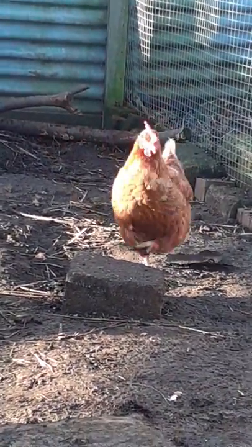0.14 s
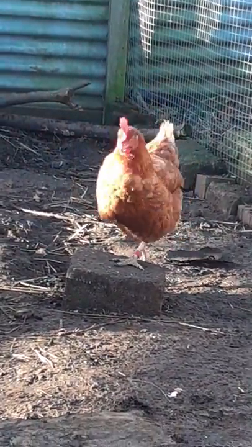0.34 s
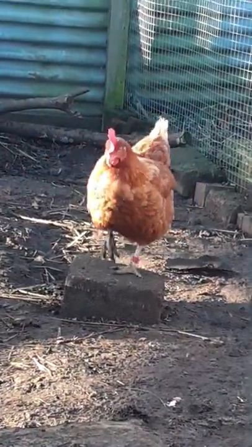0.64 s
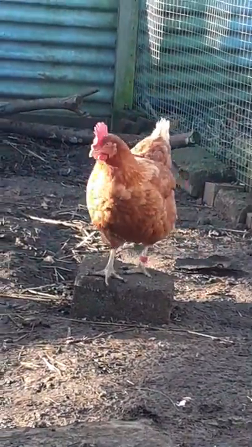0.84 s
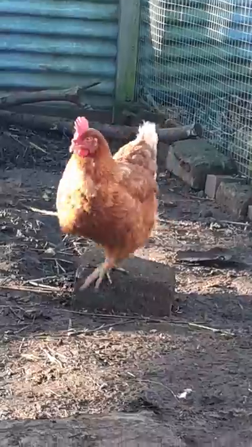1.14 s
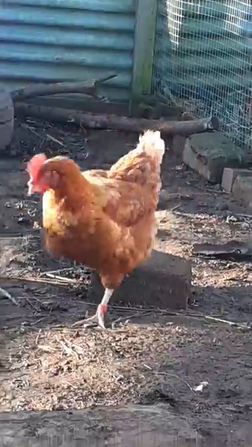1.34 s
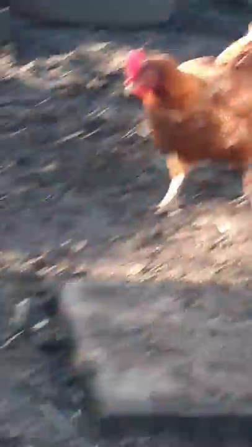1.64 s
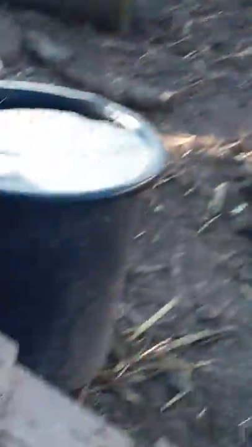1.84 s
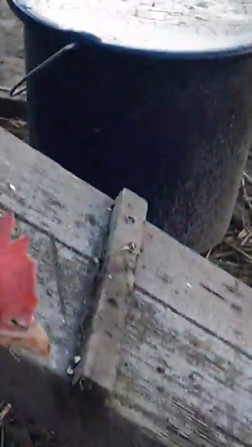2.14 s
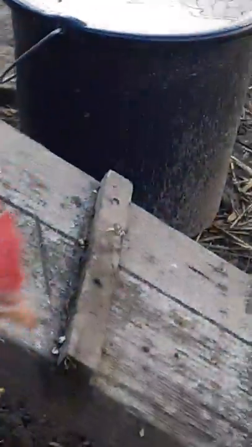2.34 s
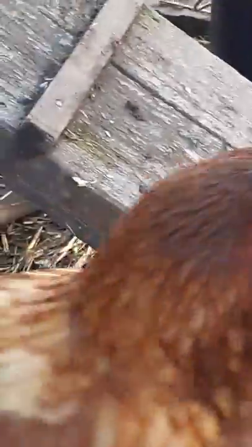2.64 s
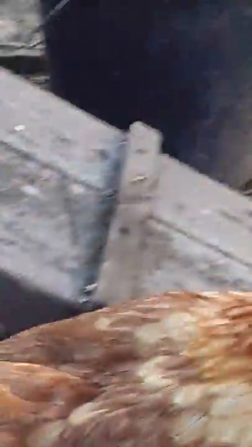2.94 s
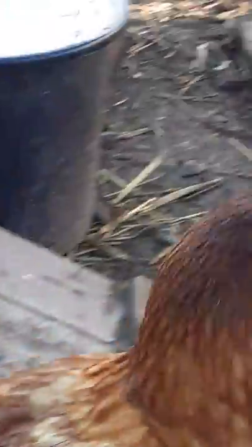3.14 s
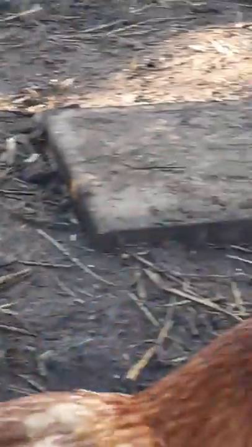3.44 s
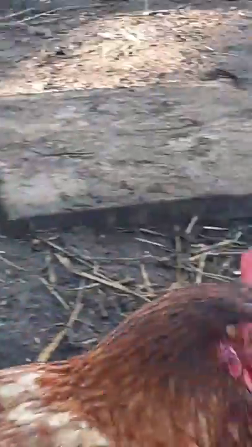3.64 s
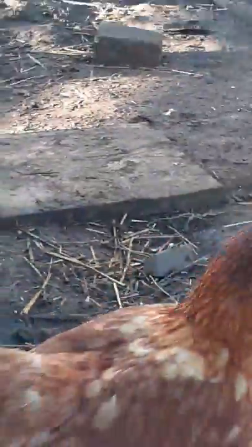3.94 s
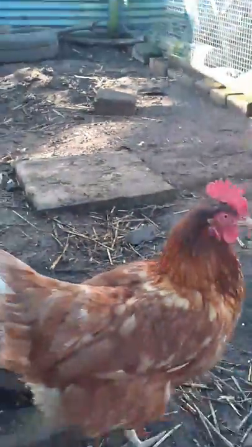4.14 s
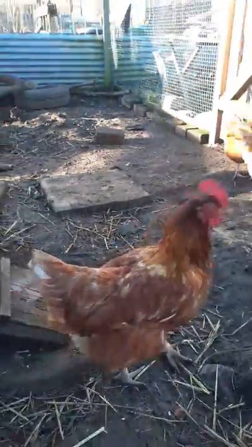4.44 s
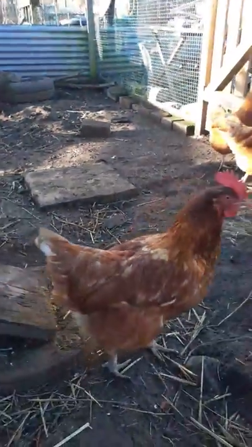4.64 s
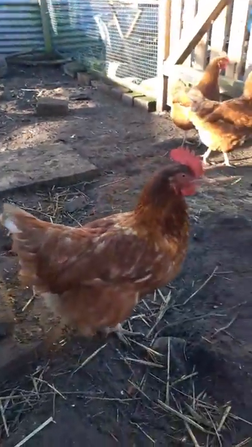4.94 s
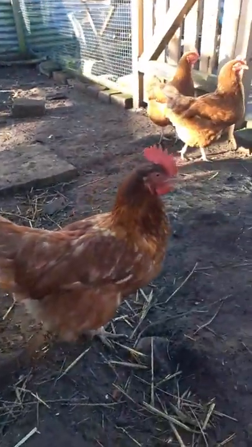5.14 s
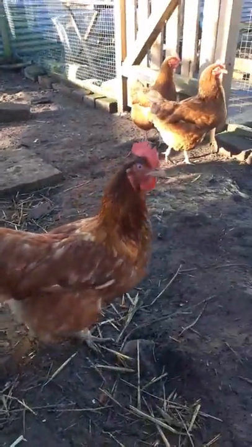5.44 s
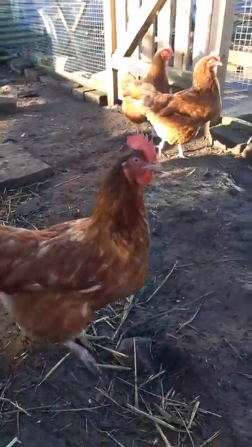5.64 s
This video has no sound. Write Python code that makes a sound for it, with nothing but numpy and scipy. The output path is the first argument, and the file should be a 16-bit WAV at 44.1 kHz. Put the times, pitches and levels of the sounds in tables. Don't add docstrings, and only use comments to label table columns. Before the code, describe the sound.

Outdoors in a chicken run, a stereo handheld phone picks up a low wind thump and a soft falling cluck at 0.1 s. From about 0.2 to 1.45 s a nearby hen gives one long call: a gravelly rising onset, then a nasal, creaky climb to roughly twice its starting pitch, with sudden cracks to higher notes, growing louder, clearer and brighter near 1.25 s before breaking off. A brisk, rough rising cluck follows at 1.63 s. Straw rustles around 1.9 s, a tiny distant bird whistle falls at 2.4 s, and a sharp straw snap comes at 2.7 s. Four short, quieter clucks run from 3.0 to 3.3 s, leading into a second, softer and hoarser rising call until 4.35 s. A scratchy rising cluck lands at 4.44 s. Afterwards only soft wind, light straw rustle and steady distant traffic hum remain until about 5.8 s. Little echo.

```python
import sys
import numpy as np
from scipy import signal
from scipy.fft import rfft, irfft
from scipy.io import wavfile
from scipy.ndimage import uniform_filter1d

SR = 44100
rng = np.random.default_rng(int(sys.argv[2]) if len(sys.argv) > 2 else 0)


def file_out(sig):
    cols = np.atleast_2d(sig).T
    lim = np.clip(cols, -1, 1)
    pcm = np.round(lim * 32767).astype(np.int16)
    wavfile.write(sys.argv[1], SR, pcm)


def field_ratio(decibels):
    return 10 ** (np.asarray(decibels, dtype=float) / 20)


N = 254898

# t/s, pitch f/Hz, effort level/dB, press level/dB
FIRST_CALL = [
    [(.175, 233.4, -49, 8), (.23, 255.9, -47.5, 10.5), (.28, 310.3, -47.5, 7.5), (.344, 376, -39.5, -4.5),
     (.39, 368, -40.5, -1.5)],
    [(.385, 368.7, -39.5, -12), (.46, 368.4, -44.5, -10), (.6, 391.8, -38, -9), (.68, 431.5, -37.5, -8),
     (.79, 439, -38, 4), (.945, 432.7, -36.5, 3), (1.07, 485, -31.5, -4), (1.2, 481, -29.5, -6),
     (1.27, 502.8, -29, -7)],
    [(1.265, 565.4, -32, -1), (1.272, 508.2, -29.5, -13), (1.306, 514, -31.5, -10.5),
     (1.318, 522, -30, -12), (1.35, 514, -29, -10.5), (1.394, 525.7, -30.5, -2), (1.405, 511, -43, 18),
     (1.425, 521, -32, -0.5), (1.448, 529, -58, 11)],
]
# t/s, pitch f/Hz, effort level/dB, press level/dB
SECOND_CALL = [
    [(3.362, 258, -62, 5), (3.375, 274.3, -54, 1.5), (3.44, 331.8, -48.5, -1.5), (3.56, 357.2, -46, -1.5),
     (3.62, 363.3, -44, -8), (3.706, 362, -46, -14)],
    [(3.702, 369.5, -47.5, -2), (3.74, 377.7, -45.5, -8.5), (3.82, 382.8, -45.5, -5.5),
     (3.95, 396.6, -42.5, -9.5), (4.085, 416.5, -49.5, 3), (4.15, 435.5, -43, -3.5),
     (4.26, 459.8, -36.5, -1.5), (4.333, 473, -32.5, -0.5), (4.342, 469.4, -44.5, -4),
     (4.36, 479.6, -52, 11)],
]
# t/s, length/s, effort level/dB, first f/Hz, last f/Hz
CLUCKS = [
    (0.111, 0.055, -52.5, 346, 273),
    (1.627, 0.061, -43, 371.7, 483.3),
    (3.012, 0.04, -51, 296, 274),
    (3.121, 0.037, -47, 310, 340),
    (3.158, 0.018, -52, 323, 315),
    (3.235, 0.072, -50.5, 293.7, 262.4),
    (4.437, 0.11, -48, 384.5, 489.7),
]
# t/s, press level/dB
CLUCK_PRESS = [(.1, 5), (1.63, -6.5), (1.66, 2), (3.02, 1.5), (3.13, -4.5), (3.26, 0), (4.45, -11.5),
               (4.5, 10), (4.54, 2)]
# t/s, level/dB
CLUCK_LIFT = [(.1, 6), (1.63, 5), (3.01, 7.5), (3.13, 9), (3.24, 6), (4.44, 0)]
# t/s, roughness/0-1, period doubling/0-1
CALL_STATE = [(.2, .55, 0), (.25, .3, 0), (.375, .28, 0), (.39, .8, .4), (.48, .8, .5), (.56, .65, .3),
              (.75, .55, .2), (.8, .24, .6), (.9, .3, .6), (1.0, .26, .55), (1.1, .36, .3), (1.18, .28, .1),
              (1.2, .19, .1), (1.265, .2, .1), (1.28, .06, .06), (1.39, .04, .05), (1.42, .35, 0),
              (3.4, .55, 0), (3.45, .42, 0), (3.56, .45, 0), (3.63, .8, 0), (3.84, .7, .1), (3.88, .45, .1),
              (4.0, .33, .1), (4.05, .28, 1), (4.1, .33, 1), (4.125, .7, 1), (4.16, .36, 1),
              (4.24, .33, .7), (4.33, .3, .5)]
# t/s, roughness/0-1.3, period doubling/0-1
CLUCK_STATE = [(.1, .45, 0), (1.62, .85, .4), (1.65, .55, .3), (1.68, .8, .4), (3.0, .8, .2), (3.2, .75, 0),
               (3.25, .42, 0), (3.3, .42, 0), (4.44, 1.3, .7), (4.51, 1.2, .6), (4.535, .6, .2)]
# t/s, length/s, f/Hz,
# fundamental level/dB, second level/dB
BREAKS = [(0.661, 0.012, 532, -33.5, -47), (0.674, 0.014, 562, -35, -45), (0.69, 0.0042, 602, -39, -48),
          (0.693, 0.0047, 562, -30, -45), (0.733, 0.0087, 590, -34, -48), (0.752, 0.0088, 622, -39, -48),
          (0.759, 0.031, 684, -31.5, -54), (0.844, 0.022, 658.5, -31, -47.5),
          (0.892, 0.0081, 614, -32.5, -42), (0.911, 0.006, 592, -37, -41), (0.923, 0.004, 576, -33.5, -47),
          (0.968, 0.007, 586.4, -35, -47), (1.018, 0.053, 539, -31.5, -50),
          (1.118, 0.004975, 551, -30, -39), (1.129, 0.0046, 592, -32, -45), (1.142, 0.015, 547, -31, -48),
          (1.172, 0.0043, 548.7, -32, -46), (1.242, 0.0042, 560, -26, -35), (1.403, 0.0077, 597, -29, -41),
          (3.425, 0.0071, 326, -62, -48), (3.705, 0.036, 373, -44, -40.5), (3.766, 0.012, 376, -46, -41),
          (3.801, 0.019, 383, -44.5, -44), (3.835, 0.024, 333.3, -56, -41),
          (4.099, 0.0086, 405.5, -63, -41), (4.126, 0.018, 407.4, -42, -42)]
# f/Hz, level/dB
BREAK_THIRD = [(1100, -11), (1560, -31), (1630, -11.5), (1760, -23), (2050, -41)]
# f/Hz, level/dB
THROAT = [(480, -7.5), (600, -2), (760, 4.5), (850, -2), (960, -3), (1100, -1.5), (1300, -14.5),
          (1550, -12.5)]
# f/Hz, level/dB
BEAK = [(1650, 7), (2050, 0), (2600, 1), (3050, -6), (3400, 2), (3650, 3), (3900, -4), (4150, -2),
        (4650, -17), (5150, -3), (5700, -19), (6200, -7), (7000, -22), (8300, -14), (9500, -34),
        (12000, -22)]
# t/s, level/dB
GAPE = [(.2, -11.5), (.3, -6), (.385, -6), (.45, 3), (.9, -2.5), (1.05, -2.5), (1.19, 7), (1.26, 12.5),
        (1.285, 13), (1.32, 12), (1.36, 5.5), (1.385, 11.5), (1.4, -2), (1.43, -1), (1.63, 7), (1.65, 13.5),
        (1.68, 6), (3.0, 2), (3.3, 7.5), (3.4, 2.5), (3.56, 1), (3.68, 5.5), (3.8, -3), (4.0, 8.5),
        (4.2, 3), (4.31, -0.5), (4.335, -2), (4.345, -14), (4.44, -5), (4.51, 0)]
# f/Hz, share
DIMMED = [(1800, 0), (1880, .3), (1940, 1.2), (2150, .7), (2300, .35), (2800, .35), (3000, .8), (3300, .3),
          (4250, .35), (4450, 1)]
# f/Hz, width/Hz, level/dB
RASP = [(780, 380, 16.5), (1410, 116, 1.5)]
# t/s, level/dB, f/Hz
CROP = [(.3, -20, 500), (.45, 7, 465), (.65, -3.5, 515), (.85, -3, 570), (1.4, -3, 635), (1.6, -21, 650),
        (3.0, -33, 680), (3.8, -23, 690), (4.1, 9.5, 658), (4.22, -4, 694.7), (4.3, -16, 717),
        (4.5, -1.5, 643)]
# f/Hz, width/Hz, level/dB
MOUTH = [(1550, 400, -6), (2520, 300, 4), (3560, 340, 6)]
# t/s, level/dB, pitch scale
MOUTH_SIZE = [(1.2, -1, .98), (1.6, -2, 1.03), (3.3, 0, 1.04), (3.38, -6, 1.1), (3.47, -4, 1.18),
              (3.52, 5, 1.15), (3.6, 5, 1.03), (3.68, 7, .98), (3.85, 6, .98), (4.05, 3, .99),
              (4.3, 1, 1.025)]
# t/s, lag of the left port/samples, left-right level/dB
BEARING = [(.1, 8.5, -0.5), (.4, 7.5, 0.5), (1.27, 2.5, 3.5), (1.631, -3.5, 2.5), (3.0, -3.5, 0),
           (3.2, 5, 0.5), (3.36, 2.5, 1.5), (4.44, 2.5, 2)]
# t/s, level/dB, f/Hz, left-right level/dB
SNAPS = [
    (0.8814, -42, 9000, 6),
    (1.108, -45, 10500, -14),
    (2.682, -35, 12690, 1),
    (3.2114, -48, 10800, -16),
    (3.473, -43.5, 11200, -13),
    (3.021, -41.5, 1190, 0),
    (3.126, -42, 1100, 0),
    (4.441, -42, 800, 2),
    (4.459, -38, 900, 2),
]
# t/s, length/s, scuff level/dB, crisp level/dB
STEPS = [(0.888, 0.017, -55, -56), (0.971, 0.11, -62.5, -62), (1.37, 0.13, -53, -54.5),
         (1.557, 0.1, -70, -56), (2.585, 0.13, -59.5, -59), (2.7, 0.39, -69.5, -78),
         (2.694, 0.087, -64, -85), (2.767, 0.078, -68.5, -81), (2.896, 0.3, -64, -62.5),
         (4.302, 0.14, -61.5, -75), (5.694, 0.15, -66, -103)]
# t/s, level/dB
STIR = [(0, -73), (.22, -73.5), (.7, -77.5), (.87, -66), (1.3, -65), (1.5, -62.5), (1.85, -56), (1.97, -58),
        (2.19, -68.5), (2.4, -61.5), (2.55, -67), (3.06, -68.5), (3.75, -68.5), (4.25, -66), (4.87, -62),
        (5.27, -77), (5.66, -63.5), (5.78, -67)]
# f/Hz, level/dB
SCUFF = [(600, -3), (1500, -12.5), (2200, -3.5), (3000, -2), (4500, -5), (6500, -8), (9000, -3),
         (15000, -25)]
# f/Hz, level/dB
CRISP = [(3000, -34), (6000, -43), (8000, 1.5), (9500, 8), (12000, -0.5), (15500, -3.5)]
# t/s, level/dB
GUSTS = [(.2, -50.5), (.3, -80), (.65, -57), (1.01, -55), (2.03, -62.5), (2.83, -84), (3.35, -69),
         (3.75, -66), (4.3, -48), (4.651, -66), (5.03, -53)]
# t/s, level/dB, f/Hz, left-right level/dB
PUFFS = [(0.099, -30, 61, 0), (0.18, -41, 88.5, 2), (0.631, -46, 59.6, 2), (0.96, -53, 78.5, 3),
         (1.141, -34, 86.25, -1), (1.215, -47, 52.9, -6), (1.467, -39.5, 56, 5), (1.811, -50, 51.1, 3),
         (3.334, -49, 46, 1), (3.442, -44, 48.4, 0), (3.544, -50.5, 66.4, -5), (4.069, -41.5, 83.5, -5),
         (4.218, -43, 111, 3), (4.332, -48, 64.5, -11), (4.365, -46.5, 100, 0), (4.46, -52, 49, -23),
         (4.535, -45.5, 80, -7), (4.61, -51, 83.4, -16), (4.76, -57, 45.8, 1), (4.975, -40.5, 71.5, -7)]
# t/s, level/dB, start f/Hz, end f/Hz, length/s
CHIRPS = [
    (2.407, -53.5, 3000, 2360, 0.029),
]
# f/Hz, level/dB per Hz
HUM = [(60, 0), (120, -10), (230, -1), (400, -16), (830, -6.5), (1020, -4.5), (1260, -13.5), (2360, -20.5),
       (2830, -20.5), (3590, -23), (6500, -31.5), (8000, -36), (9700, -50), (11800, -31), (15500, -31)]
# t/s, level/dB
SWELL = [(0, 2.5), (.4, 4.5), (1.55, 2.5), (2.2, 1), (2.8, 2.5), (3.3, 2), (4.7, 3.5), (5.2, 0.5),
         (5.78, 4.5)]
# t/s, lead of the left port/samples
TRAFFIC_LAG = [(0, 3.8), (1.5, 3.8), (2.9, 5.3), (4.2, 8.9), (4.8, 9.6), (5.3, 9.1), (5.78, 7.1)]
# f/Hz, likeness/0-1
LIKENESS = [(60, 0.94), (300, 0.75), (900, 0.68), (1500, 0.75), (2500, 0.067), (3600, 0.12), (7000, 0.14),
            (13000, 0.046)]
# f/Hz, left-right level/dB
BALANCE = [(100, 0), (3500, .5), (7000, -1.5), (12000, -4)]
# f/Hz, width/Hz, level/dB
TREBLE_DIP = (9550, 2560, -14)


def evened(x):
    return x / np.sqrt(np.mean(x ** 2) + 1e-20)


def read(points, hz):
    f, value = np.transpose(points)
    return np.interp(np.log(hz + 1), np.log(f + 1), value)


def curve(points, t, column=1):
    columns = np.transpose(points)
    return np.interp(t, columns[0], columns[column])


def add(mix, s, sound, pan_db):
    part = mix[:, max(round(s * SR), 0):][:, :np.shape(sound)[-1]]
    gain = field_ratio(np.array([[pan_db / 2], [-pan_db / 2]]))
    part += (gain * sound)[:, :part.shape[1]]


def resonate(x, hz, width):
    turn = np.exp(2j * np.pi * np.cumsum(hz * np.ones(len(x))) / SR)
    r = np.exp(-np.pi * width / SR)
    smooth = signal.lfilter([(1 - r) ** 2], [1, -2 * r, r * r], x / turn)
    return 2 * (turn * smooth).real


def drift(count, span):
    once = uniform_filter1d(rng.standard_normal(count), span)
    return evened(uniform_filter1d(once, span))


def cluck(start, length, db, first_hz, last_hz):
    s = np.array([0, 0.005, 0.45 * length, length - 0.008, length])
    pitch_hz = first_hz + (last_hz - first_hz) * s / length
    effort_db = db + np.array([-8, -3.5, 0, 0, -11])
    return np.transpose([start + s, pitch_hz, effort_db, curve(CLUCK_PRESS, start + s)])


def break_register(t, hz, first, second, third):
    jumped = np.zeros(len(t))
    for start, length, jump_hz, first_db, second_db in BREAKS:
        inside = abs(t - start - length / 2) < length / 2
        gate = uniform_filter1d(1. * inside, 150)
        hz = hz + gate * (jump_hz - hz)
        jumped = jumped + gate
        third_db = first_db + read(BREAK_THIRD, 3 * jump_hz)
        third = third + gate * (field_ratio(third_db) - third)
        first = first + gate * (field_ratio(first_db) - first)
        second = second + gate * (field_ratio(second_db) - second)
    return hz, first, second, third, jumped


def breath(t, turns):
    puffs = (1.5 + np.exp(-(turns % 1) / 0.45)) * rng.standard_normal(len(t))
    size = curve(MOUTH_SIZE, t, 2)
    rasp = evened(sum(field_ratio(db) * resonate(puffs, f, w) for f, w, db in RASP))
    hiss = evened(sum(field_ratio(db) * resonate(puffs, f * size, w) for f, w, db in MOUTH))
    pocket = evened(resonate(puffs, curve(CROP, t, 2), 120))
    rasp = rasp + field_ratio(curve(CROP, t)) * pocket
    rasp = signal.sosfilt(signal.butter(3, 340, "high", fs=SR, output="sos"), rasp)
    return rasp, hiss


def voice(rows, state, lift_db):
    s = np.transpose(rows)[0]
    t = np.arange(s[0], s[-1], 1 / SR)
    hz, effort_db, press_db = (curve(rows, t, k) for k in (1, 2, 3))
    rough, double = (curve(state, t, k) for k in (1, 2))
    gape_db = curve(GAPE, t)

    second_db, third_db = (effort_db + press_db + read(THROAT, k * hz) for k in (2, 3))
    third_db = third_db + 0.98 * gape_db
    low_db = [effort_db, second_db, third_db]
    effort = np.sqrt(sum(field_ratio(db) ** 2 for db in low_db))
    beak_db = -62 + 1.43 * (effort_db + 41.5) + 0.85 * press_db + gape_db
    hz, first, second, third, jumped = break_register(t, hz, *field_ratio(np.array(low_db)))

    flutter_db = 11
    wobble = rough * (.088 * drift(len(t), 60) + .03 * drift(len(t), 350)) + .002 * drift(len(t), 500)
    second = second * field_ratio(flutter_db * rough * np.minimum(drift(len(t), 500), .5))
    third_depth = flutter_db * 1.3 * np.minimum(rough + .1, .6)
    third = third * field_ratio(third_depth * np.minimum(drift(len(t), 300), .3))

    turns = np.cumsum(hz * (1 + wobble)) / SR
    calm = np.cumsum(hz * (1 + .55 * wobble)) / SR

    def part(k):
        phase = turns if k < 4 else calm
        return np.sqrt(2) * np.cos(2 * np.pi * k * phase + 1.04 * k + 0.424 * k * k)

    def gaps_db():
        return flutter_db * (rough + .02) * np.minimum(drift(len(t), 450), .5)

    shut_db = np.clip(-54 - beak_db, 0, 12) + 70 * np.clip(rough - .07, 0, .18)
    whole = 1 - 0.72 * jumped
    upper = np.zeros(len(t))
    for k in range(4, 25):
        level_db = read(BEAK, k * hz) - shut_db * read(DIMMED, k * hz) + lift_db * (k * hz < 1900)
        upper = upper + field_ratio(level_db + gaps_db()) * part(k)

    tone = first * part(1) + second * part(2) + third * part(3)
    tone = tone + whole * field_ratio(beak_db - 9.5) * upper
    half_lines = .4 * part(1.5) + .08 * part(2.5) + .04 * part(.5)
    tone = tone + double * first * field_ratio(gaps_db()) * half_lines
    tone = tone * field_ratio(2.8 * np.minimum(rough, .7) * drift(len(t), 100))

    rasp, hiss = breath(t, turns)
    rasp = 0.89 * rough * effort * whole * rasp
    hiss = 1.8 * rough * field_ratio(beak_db + curve(MOUTH_SIZE, t)) * hiss
    edge = np.clip(np.minimum(t - t[0], t[-1] - t) / 0.0054, 0, 1)
    return edge * (tone + rasp + hiss)


def hen():
    out = np.zeros((2, N))
    sounds = [(phrase, CALL_STATE, 0) for phrase in [*FIRST_CALL, *SECOND_CALL]]
    sounds += [(cluck(*c), CLUCK_STATE, curve(CLUCK_LIFT, c[0])) for c in CLUCKS]
    for rows, state, lift_db in sounds:
        start = rows[0][0]
        lag, pan_db = (curve(BEARING, start, k) for k in (1, 2))
        delays = np.array([[lag / 2], [-lag / 2]])
        taps = np.sinc(np.arange(-16, 17) - delays) * np.hanning(33)
        both = signal.oaconvolve(voice(rows, state, lift_db)[None], taps, axes=1)
        add(out, start - 16 / SR, both, pan_db)
    t = np.arange(9000) / SR
    sparse = rng.standard_normal((2, len(t))) * (rng.random((2, len(t))) < .05)
    echoes = sparse * (t > .003) * field_ratio(-60 * t / 0.1)
    echoes = echoes / np.linalg.norm(echoes, axis=1, keepdims=True)
    return out + field_ratio(-13) * signal.fftconvolve(out, echoes, axes=1)[:, :N]


def snaps():
    out, t = np.zeros((2, N)), np.arange(400) / SR
    for s, db, hz, pan_db in SNAPS:
        burst = rng.standard_normal((2, len(t))) * field_ratio(-60 * t / 0.0091)
        if hz <= 3000:
            burst = burst[[0, 0]]
        tick = np.array([resonate(port, hz, min(5200, 1.06 * hz)) for port in burst])
        add(out, s, field_ratio(db) * tick / abs(tick).max(), pan_db)
    return out


def wind():
    rumbles = [resonate(rng.standard_normal(N), 59, 59) * field_ratio(3.5 * drift(N, 900)) for _ in range(3)]
    shared, *own = rumbles
    level = field_ratio(-72)
    for s, db in GUSTS:
        since = np.arange(N) / SR - s
        level = level + field_ratio(db - np.maximum(-78 * since, 41 * since))
    out = level * field_ratio(0.5) * evened(shared + 0.79 * np.array(own))
    t = np.arange(0, 0.049, 1 / SR)
    for s, db, hz, pan_db in PUFFS:
        phase, apart = rng.random(2)
        cycles = hz * t * (1.3 - 0.27 * t / t[-1])
        push = np.sin(2 * np.pi * (cycles + phase + 0.38 * apart * np.array([[0], [1]])))
        add(out, s, field_ratio(db) * push * np.hanning(len(t)), pan_db)
    return out


def bird():
    out = np.zeros((2, N))
    for s, db, start_hz, end_hz, length in CHIRPS:
        hz = np.linspace(start_hz, end_hz, int(length * SR))
        hz = hz * (1 + 0.015 * drift(len(hz), 52))
        whistle = np.sin(2 * np.pi * np.cumsum(hz) / SR) * np.hanning(len(hz))
        add(out, s, field_ratio(db) * whistle, 1.0)
    return out


def shape(points, hz):
    gain = field_ratio(read(points, hz))
    return gain / np.linalg.norm(gain)


def straw(t, hz):
    stir_db = curve(STIR, t)
    s, length, scuff_db, crisp_db = np.transpose(STEPS)
    bump = np.exp(-(2 * (t[:, None] - s) / length) ** 2)
    scuff = np.hypot(field_ratio(-71 + 0.9 * (stir_db + 69.0)), bump @ field_ratio(scuff_db))
    crisp = np.hypot(field_ratio(stir_db), bump @ field_ratio(crisp_db))
    flicker_db = 1.1 * drift(len(t), 3)
    dull_power = (shape(SCUFF, hz) * scuff * field_ratio(3.5 + flicker_db)) ** 2
    return dull_power + (shape(CRISP, hz) * crisp * field_ratio(3.0 + flicker_db)) ** 2


def traffic(t, hz):
    level_db = -55 + curve(SWELL, t) + 0.49 * drift(len(t), 40)
    return (shape(HUM, hz) * field_ratio(level_db)) ** 2


def background():
    frames, hz = N // 128 + 5, np.fft.rfftfreq(512, 1 / SR)[:, None]
    t = np.arange(frames) * 128 / SR
    a, b, c, d, patches = rng.standard_normal((frames, 257, 5)).T
    patches = evened(uniform_filter1d(uniform_filter1d(patches, 6, axis=0), 24, axis=1))
    power = traffic(t, hz) + straw(t, hz)
    same = np.clip(read(LIKENESS, hz), 0, 1)
    left, other = a + 1j * b, c + 1j * d
    delay = np.exp(-2j * np.pi * hz * curve(TRAFFIC_LAG, t) / SR)
    right = same * left * delay + np.sqrt(1 - same ** 2) * other
    side = field_ratio(read(BALANCE, hz) / 2)
    z = np.array([left * side, right / side]) * np.sqrt(power) * field_ratio(1.7 * patches)
    return field_ratio(3) * signal.istft(z, nperseg=512, noverlap=384)[1][:, :N]


def scene():
    return hen() + snaps() + wind() + bird() + background()


def low_pass(x):
    return signal.sosfilt(signal.butter(12, 16100, fs=SR, output="sos"), x)


def record(dry):
    hz = np.fft.rfftfreq(N, 1 / SR)
    dip_hz, width, db = TREBLE_DIP
    dip = field_ratio(db * np.exp(-((hz - dip_hz) / width * 2) ** 2))
    bass_cut = 1 / np.sqrt(1 + (41 / (hz + 1)) ** 8)
    colour = dip * (hz < 15560) * bass_cut
    mix = irfft(rfft(dry) * colour, N)
    return low_pass(mix)


dry = scene()
out = record(dry)
file_out(out)
```